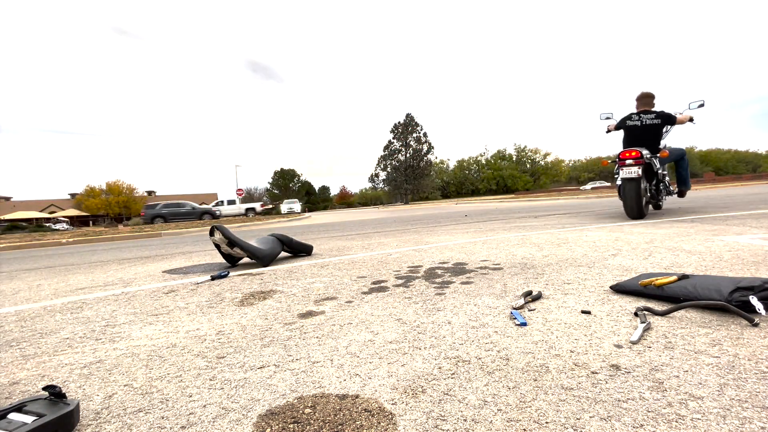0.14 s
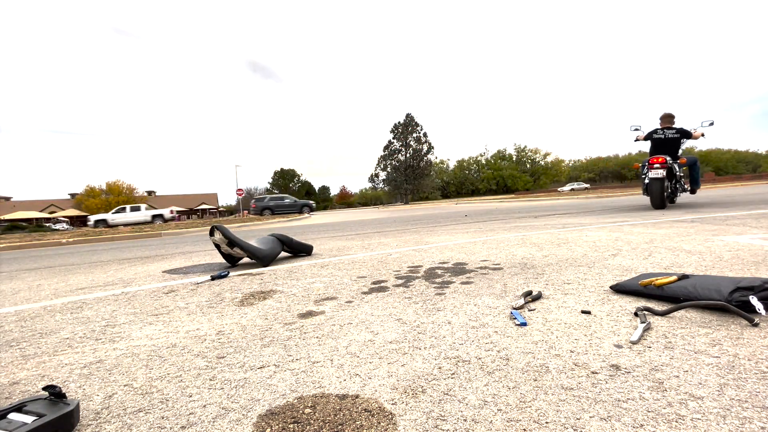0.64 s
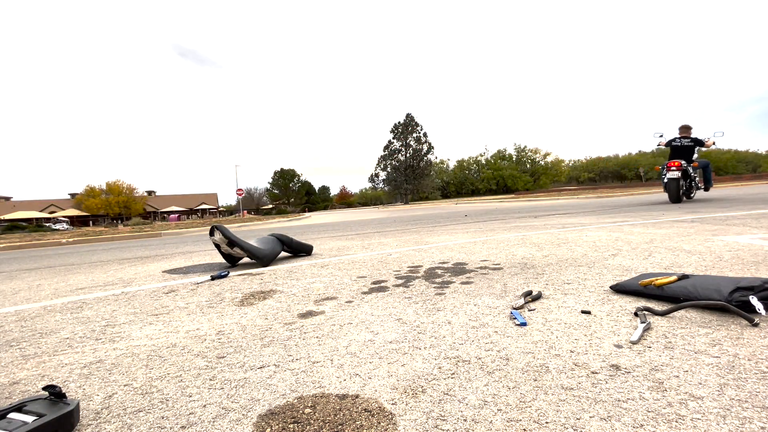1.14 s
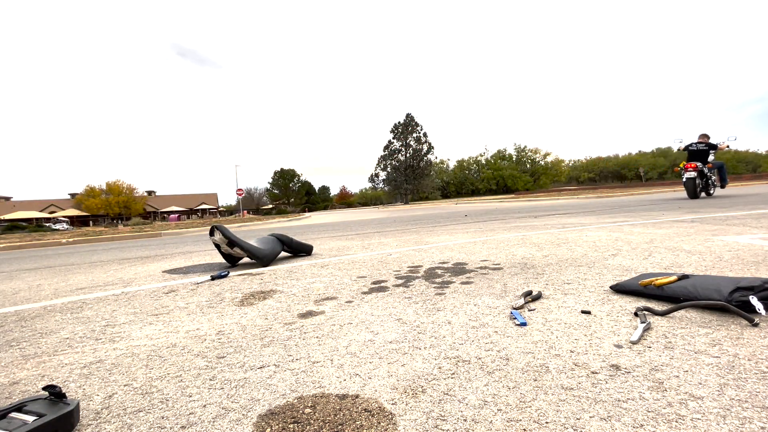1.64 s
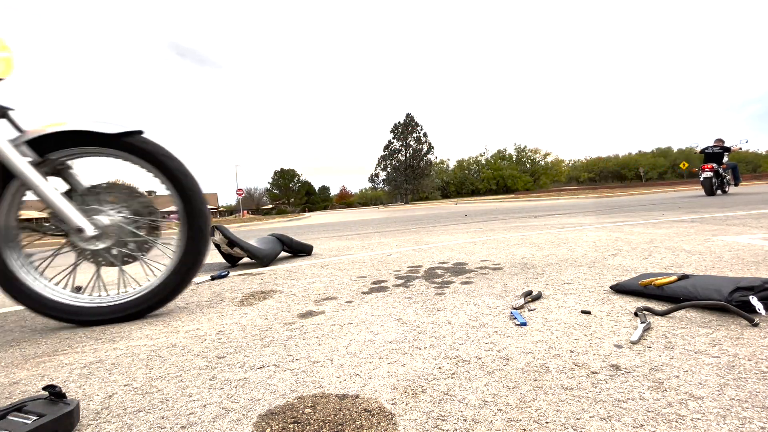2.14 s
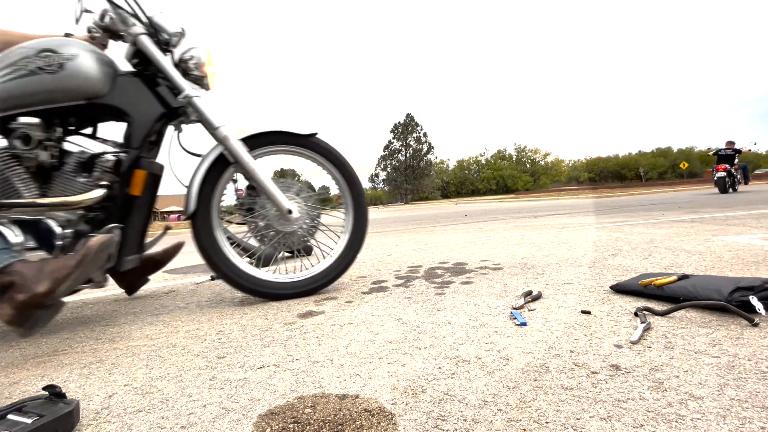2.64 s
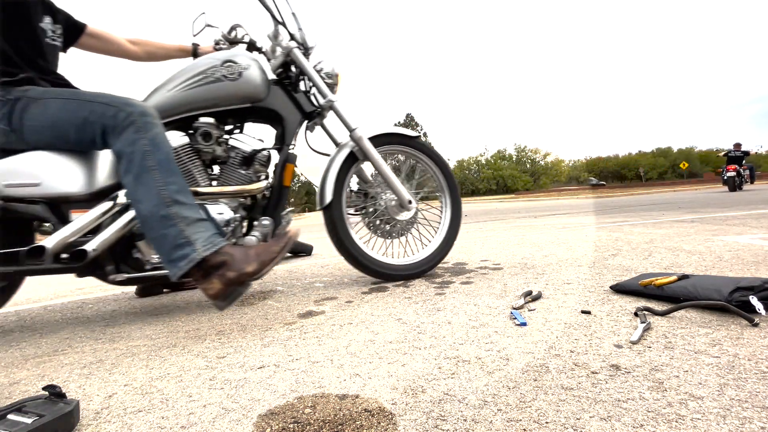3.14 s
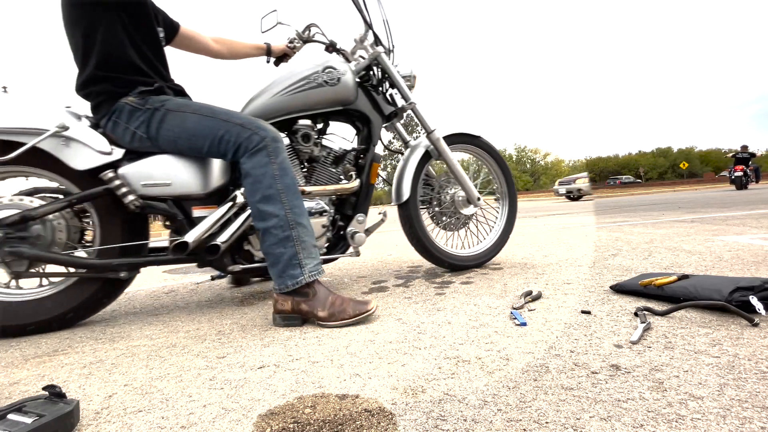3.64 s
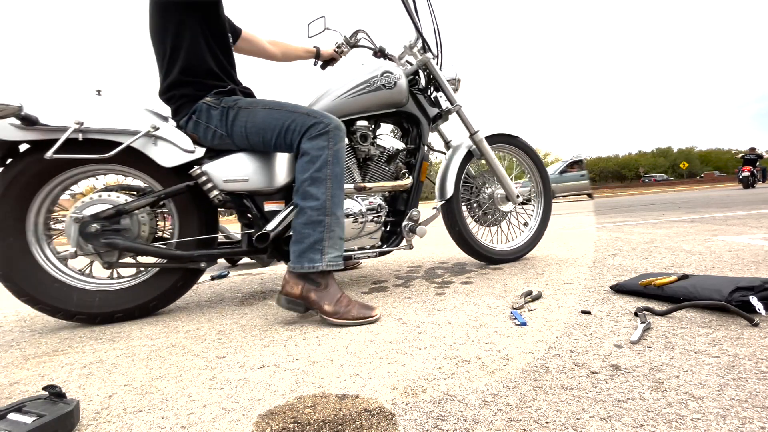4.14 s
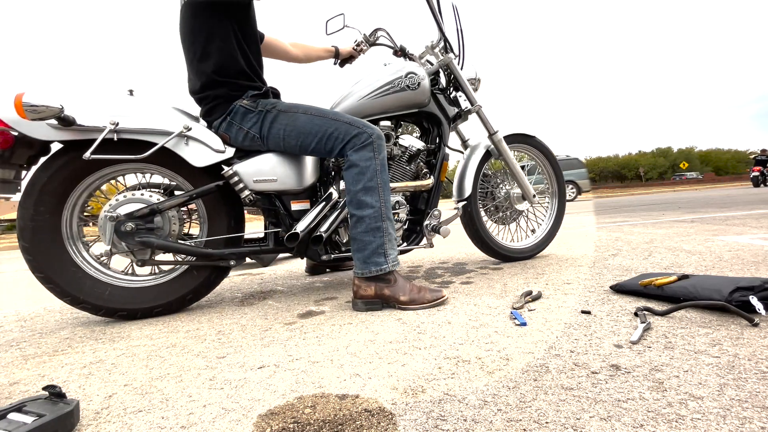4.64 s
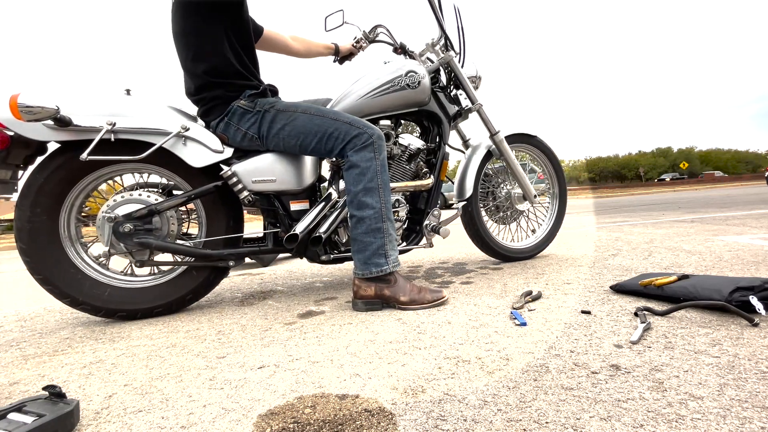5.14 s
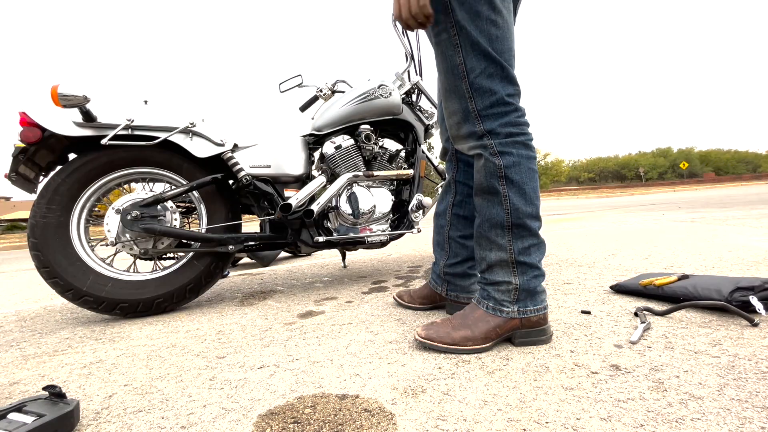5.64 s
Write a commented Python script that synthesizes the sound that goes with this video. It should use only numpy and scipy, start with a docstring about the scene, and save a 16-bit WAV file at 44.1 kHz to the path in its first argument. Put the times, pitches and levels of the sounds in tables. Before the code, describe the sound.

Lumpy two-cylinder motorcycle idle outdoors with three quick barking revs, a choppy settling idle, faint thuds and a louder close rev at the end.

```python
"""A V-twin idles unevenly, blips the throttle three times, then idles on with misfires and three low thuds.
At 5.478 s it is heard from closer, blipping once more. Each firing rings its pipe and gates noise:
crack, hiss and bark. Valve gear rustles; asphalt, cars and buildings scatter the sound over faint traffic.
Two spaced microphones: the left lags at the first place and leads at the closer one."""
import sys
import numpy as np
from scipy import signal
from scipy.fft import rfft, irfft
from scipy.io import wavfile

SR = 44100
rng = np.random.default_rng(int(sys.argv[2]) if len(sys.argv) > 2 else 0)


def put_to_file(sound):
    """Save the sound as 16-bit audio at rate SR, in the file named by the first command-line argument."""
    columns = np.atleast_2d(sound).T  # one column per channel
    safe = np.clip(columns, -1, 1)
    whole_steps = np.round(safe * 32767)
    wavfile.write(sys.argv[1], SR, whole_steps.astype(np.int16))


def how_loud(loudness_db):
    """Turn decibels into a plain amplitude multiplier (0 dB gives 1, 20 dB gives 10)."""
    steps = np.asarray(loudness_db, float) / 20
    return 10 ** steps


N = 254456
TIME = np.arange(N) / SR
HZ = np.arange(N // 2 + 1) * SR / N + 1e-3
CLOSER_S = 5.478


def shape(x, table):
    """Colour by (Hz, dB) points on a log frequency axis."""
    hz, db = np.transpose(table)
    gain_db = np.interp(np.log(HZ), np.log(hz), db)
    return irfft(rfft(x) * how_loud(gain_db), N)


def noise(table):
    """Coloured noise of rms 1."""
    x = shape(rng.standard_normal(N), table)
    return x / x.std()


def add(out, start_s, grain):
    """Mix a grain in at start_s."""
    i = int(start_s * SR)
    out[i:i + len(grain)] += grain[:N - i]


def hold(t, start_s, length_s, rise_s, fall_s):
    """0 to 1 and back: rise, hold, fall."""
    rise = np.clip((t - start_s) / rise_s, 0, 1)
    fall = np.clip((start_s + length_s - t) / fall_s, 0, 1)
    return rise * fall


def engine():
    """Each firing rings its pipe and gates gas noise; returns the full sound and a second draw of its gas."""
    s, rear, rate, size = firings()
    pipe_db, crack_db, bark_db, hiss_db, rear_db = load(s, rate)
    chance = rng.standard_normal((len(s), 8, 2))
    crack_db += rear_db * (rear - .5) + 1.2 * chance[:, 6, 0]
    hiss_db += 2.5 * chance[:, 6, 1]
    # each crack favours its own parts of the jet noise: 3 dB spread
    lean_db = 3 * rng.standard_normal((len(s), len(CRACK_PART_EDGES) + 1))
    # a harder firing strengthens the lowest part
    lean_db[:, 0] += 1.16 * (bark_db + 7.5)

    pipe, hiss, bark, *parts = np.zeros((3 + lean_db.shape[1], N))
    sharp = puff(rise_s=.003, fall_s=.001, echo_s=.0082, echo_db=-10.5, tail_s=.0066, tail_db=-31)
    top = puff(rise_s=.003, fall_s=.0009, echo_s=.0078, echo_db=-22, tail_s=.005, tail_db=-40)
    soft = puff(rise_s=.0069, fall_s=.0025, echo_s=.0079, echo_db=-2.5, tail_s=.013, tail_db=-22.5)
    for k in range(len(s)):
        pipe_gain = size[k] ** .5 * how_loud(pipe_db[k] + 6)
        add(pipe, s[k], pipe_gain * ring(rear[k], rate[k], bark_db[k], chance[k]))
        # gas leaks past the valve just before the blowdown
        early_s = max(s[k] - .001, 0)
        for part, db in zip(parts, lean_db[k]):
            add(part, early_s, size[k] * how_loud(crack_db[k] + db + 36.5) * sharp)
        add(hiss, early_s, size[k] * how_loud(crack_db[k] + hiss_db[k] + 36.5) * top)
        bark_gain = how_loud(pipe_db[k] + bark_db[k] + 17.5 + 2 * chance[k, 7, 0])
        add(bark, early_s, size[k] * bark_gain * soft)

    rate_now = speed()
    running_db = load(TIME, rate_now)[0]
    rumble = how_loud(running_db - 12.5) * noise(TRAFFIC_COLOUR)
    # valve gear rustles more at speed
    rustle_db = running_db - 38.5 + 0.41 * (rate_now - 13)
    heard = pipe + rumble + gas(parts, hiss, bark, rustle_db)
    return heard, gas(parts, hiss, bark, rustle_db)


# weak or failed firings: start_s [s], level_db [dB of gas noise; the pipe ring drops half as many dB]
MISFIRES = [(2.21, -11), (2.41, -15), (2.715, -33), (2.873, -26), (3.03, -21), (3.186, -15), (4.98, -13),
            (5.43, -11.5)]


def firings():
    """Times, cylinder (0 front, 1 rear), speed and size; rear follows front closely, then a long gap."""
    start_cycle, closer_cycle, rear_cycle = -.117, .37, .384
    rate, s, rear = speed(), [], []
    for start, heard in ((start_cycle, TIME < CLOSER_S), (closer_cycle, TIME >= CLOSER_S)):
        cycle = start + np.cumsum(rate[heard]) / SR
        whole = np.arange(int(cycle[-1]) + 1)
        fire = np.ravel([whole, whole + rear_cycle], order="F")
        keep = (fire > cycle[0]) & (fire < cycle[-1])
        s.extend(np.interp(fire[keep], cycle, TIME[heard]))
        rear.extend((np.arange(len(fire)) % 2)[keep])
    s, size = np.array(s), np.ones(len(s))
    for start_s, level_db in MISFIRES:
        size[np.argmin(abs(s - start_s))] = how_loud(level_db)
    return s, np.array(rear), np.interp(s, TIME, rate), size


# speed without blips: start_s [s], rate [four-stroke cycles/s]
IDLE_SPEED = [(0, 14.441), (.196, 11.518), (.367, 13.073), (.584, 12.59), (1.473, 14.215), (1.731, 17.765),
              (2.553, 12.349), (2.998, 12.688), (3.425, 12.758), (3.766, 16.473), (4.246, 14.357),
              (4.861, 14.524), (5.163, 13.536), (5.404, 12.247)]
# throttle blips: start_s [s], length_s [s], push [cycles/s gained per s]
BLIPS = [(.636, .186, 78.846), (.938, .218, 86.526), (1.448, .184, 67.806)]
# speed heard from closer: start_s [s], rate [cycles/s]
CLOSER_SPEED = [(5.478, 18.5), (5.51, 20.9), (5.55, 23.3), (5.65, 20.6), (5.77, 18.27)]


def speed():
    """Idle speed plus what each blip adds and the flywheel slowly loses."""
    grip_s, flywheel_s = .03, .3
    push = sum(gain * hold(TIME, s, length_s, grip_s, grip_s) for s, length_s, gain in BLIPS)
    spin = signal.lfilter([1 / SR], [1, -np.exp(-1 / SR / flywheel_s)], push)
    far = np.interp(TIME, *np.transpose(IDLE_SPEED)) + spin
    closer = np.interp(TIME, *np.transpose(CLOSER_SPEED))
    return np.where(TIME < CLOSER_S, far, closer)


# full charges: start_s [s], length_s [s], pipe_gain_db [dB, unless the rev gain is higher]
ROARS = [(0.634, 0.21, 2), (0.933, 0.21, 9), (1.454, 0.21, 9.5), (5.444, 0.14, 6)]
# place and pipe bearing, one table per listening place: start_s [s], pipe_db [dB],
# hiss_db [dB over crack], rear_db [dB, crack of rear over front cylinder]
BEARING = ([(0, -27.5, 4.5, 4.5), (.3, -30, -1, -0.5), (.55, -33, -6.5, 0), (.75, -28, -1.5, 6.5),
           (.9, -33, -13, 1.5), (1.1, -33, -10.5, -4), (2, -34.5, -21.5, 4.5), (2.4, -35.5, -20, -1),
           (3.3, -35, -10, 1.5), (3.9, -33, -20, 1.5), (4.7, -35, -7, 7), (4.9, -38, -17, 1),
           (5.15, -36, -17.5, -1.5), (5.47, -38, -5, -5.5)], [(5.479, -25.5, -10, 5),
           (5.56, -21, -7.5, -6.5), (5.61, -26, -1, -9.5), (5.77, -20, -2, -1.5)])


def load(t, rate):
    """Pipe, crack, bark, hiss and rear-share dB from place, charge and speed."""
    roar_rise_s, roar_fall_s = .056, .042
    rev_from, rev_db = 18.86, .7963  # cycles/s; dB per cycle/s above it
    overrun_from, overrun_span = 16, 4  # cycles/s
    at_s, *columns = np.concatenate(BEARING).T
    place_db, hiss_db, rear_db = (np.interp(t, at_s, c) for c in columns)
    roars = [(hold(t, s, length_s, roar_rise_s, roar_fall_s), db) for s, length_s, db in ROARS]
    full = sum(swell for swell, db in roars)
    # the shut throttle starves the cylinders at higher speed
    overrun = np.clip((rate - overrun_from) / overrun_span, 0, 1)
    roar_db = sum(swell * db for swell, db in roars)
    pipe_db = place_db + np.maximum(roar_db, rev_db * np.maximum(rate - rev_from, 0))

    def by_load(idle_db, overrun_db, full_db):
        """Blend idle, starved and full-charge levels."""
        return (1 - full) * (idle_db + overrun * (overrun_db - idle_db)) + full * full_db

    crack_db = pipe_db + by_load(idle_db=-14, overrun_db=-28.5, full_db=-10)
    bark_db = by_load(idle_db=-16, overrun_db=-14.5, full_db=-8)
    return pipe_db, crack_db, bark_db, hiss_db, rear_db


# main ring, rows front and rear: pitch_hz [Hz], glide_hz_per_s [Hz/s at 13 cycles/s], crest_s [s],
# extra_turns [turns, decaying from 4 ms], open_cycles [engine cycles the valve stays open]
MAIN_RING = [(119.8, 850, 0.01767, 0.5, 0.37), (156.2, 4240, 0.01734, 0.65, 0.28)]
# other pipe modes: pitch_hz [Hz], glide_hz_per_s [Hz/s at 13 cycles/s], decay_s [s],
# level_db [dB; above 250 Hz the bark level is added]
FRONT_MODES = [(78.4, -4, 0.018, -14), (133.9, -1, 0.044, -13.5), (280.2, 8997, 0.023, 3.5),
               (557, 5997, 0.014, -8.5), (718, 1, .012, -14.5)]
REAR_MODES = [(84.8, -7, 0.017, -12), (184.55, 1995, .025, -5.5), (429.5, 9000, 0.025, -1.5),
              (303, 2997, 0.0087, 5), (930, 0, 0.014, -8)]


def ring(rear, rate, bark_db, chance):
    """The blowdown starts high, the pipe rings while the valve is open, hot gas draws the pitch up."""
    ring_start_s, blowdown_s = .0025, .003
    detune, scatter_db, mode_scatter_db = .02, 1.3, 2.5
    t = np.arange(int(.08 * SR)) / SR
    u = np.maximum(t - ring_start_s, 0)
    hz, glide, crest_s, extra, cycles = MAIN_RING[rear]
    blowdown = extra * np.exp(-(t - .004) / blowdown_s)
    # the gas heats the pipe sooner at higher speed
    warming = rate / 13
    turns = hz * (1 + detune * chance[0, 0]) * (t - crest_s)
    turns = turns + glide * warming * (t - crest_s) ** 2 / 2 - blowdown
    # a harder firing arrives more abruptly
    rise_s = .001 * how_loud(-1.5 * (bark_db + 7))
    # the closing valve ends the main ring and the upper modes
    flow = np.exp(-(u * rate / cycles) ** 3)
    out = how_loud(scatter_db * chance[0, 1]) * (1 - np.exp(-u / rise_s)) * flow * np.cos(2 * np.pi * turns)
    for (hz, glide, decay_s, db), (a, b) in zip((FRONT_MODES, REAR_MODES)[rear], chance[1:]):
        upper = hz > 250
        db = db + mode_scatter_db * b + (bark_db if upper else 0)
        turns = hz * (1 + 2.5 * detune * a) * u + glide * warming * u ** 2 / 2
        envelope = (1 - np.exp(-u / .004)) * np.exp(-u / decay_s) * (flow if upper else 1)
        out = out + how_loud(db) * envelope * np.sin(2 * np.pi * turns)
    return out


def puff(rise_s, fall_s, echo_s, echo_db, tail_s, tail_db):
    """Gas envelope: a short burst, its return from the far end of the pipe, then slow outflow."""
    t = np.arange(int(.08 * SR)) / SR
    swell = lambda u: (1 - np.exp(-np.maximum(u, 0) / rise_s)) ** 2
    burst = lambda u: swell(u) * np.exp(-np.maximum(u, 0) / fall_s)
    outflow = how_loud(tail_db) * swell(t) * np.exp(-t / tail_s)
    return burst(t) + how_loud(echo_db) * burst(t - echo_s) + outflow


# colour of top hiss: pitch_hz [Hz], level_db [relative dB]
HISS_COLOUR = [(7000, -20), (9000, 19.5), (11000, 18), (13000, 14.5), (15000, -13), (16500, 11.5)]
# colour of bark: pitch_hz [Hz], level_db [relative dB]
BARK_COLOUR = [(200, -14), (350, -8), (500, 1), (700, 7.5), (1000, 0.5), (1400, -10.5), (2000, -25),
               (3000, -33)]


def gas(parts, hiss, bark, rustle_db):
    """Turbulent gas as gated crack, hiss and bark noise, plus steady valve-gear rustle."""
    jet = crack(parts) + hiss * noise(HISS_COLOUR) + bark * noise(BARK_COLOUR)
    return jet + how_loud(rustle_db) * noise(CRACK_COLOUR)


# colour of crack and rustle: pitch_hz [Hz], level_db [relative dB]
CRACK_COLOUR = [(400, -34), (900, 7.5), (1600, 7.5), (2400, 1), (3500, -4.5), (4600, -1.5), (5600, -0.5),
                (7000, -3.5), (8500, -14.5), (10000, -7), (13000, -84)]
# edges between parts of the crack: edge_hz [Hz]
CRACK_PART_EDGES = [1800, 2700, 3800, 5200, 7000, 9500]


def crack(parts):
    """Jet noise whose parts, low to high, follow their own envelopes."""
    jet = rfft(noise(CRACK_COLOUR))
    below = [0] + [1 / (1 + (HZ / edge_hz) ** 8) for edge_hz in CRACK_PART_EDGES] + [1]
    return sum(part * irfft(jet * (hi - lo), N) for part, lo, hi in zip(parts, below, below[1:]))


# colour at the closer place: pitch_hz [Hz], level_db [dB]
CLOSER_COLOUR = [(100, 2), (300, 0.5), (520, 4), (720, -4), (1050, -8), (1500, -0.5), (2100, 8),
                 (2900, 2.5), (6000, 2.5), (12000, 6)]


def closer_colour(x):
    """Tone shifts at the closer listening place."""
    return np.where(TIME < CLOSER_S, x, shape(x, CLOSER_COLOUR))


# one table per listening place: pitch_hz [Hz], lag [samples, left after right], level_db [dB, left minus right]
# bass bends round the housing and shifts most
PORTS = [
    [(100, 26.7, -1.5), (630, 21.54, -3.5), (1290, 12.33, -3.5), (4500, 11.58, -3), (9300, 11.49, -4.5),
     (15300, 11.38, 6.5)],
    [(100, -32, -2), (300, -13, -1), (1030, -5, 1), (4900, -3.5, -1), (8060, -2, 7), (14600, -3.5, 1.5)],
]


def microphones(x):
    """Spacing sets lag and level between left and right at each listening place."""
    places = []
    for table in PORTS:
        hz, lag, db = np.transpose(table)
        lag, db = (np.interp(np.log(HZ), np.log(hz), c) for c in (lag, db))
        half = how_loud(db / 2) * np.exp(-1j * np.pi * HZ * lag / SR)
        places.append(irfft(rfft(x) * np.array([half, 1 / half]), N))
    return np.where(TIME < CLOSER_S, *places)


# thuds as the boots come down: start_s [s], level_db [dB, before 4/3 envelope crest], pitch_hz [Hz]
THUDS = [(3.13, -40, 45.7), (3.52, -52, 51.3), (4.06, -58, 45)]


def thuds():
    """Soft low blows on the ground: sines that swell for 20 ms and die away."""
    out, t = np.zeros(N), np.arange(int(.2 * SR)) / SR
    envelope = t / .015 * np.exp(1 - t / .02)
    for start_s, level_db, pitch_hz in THUDS:
        add(out, start_s, how_loud(level_db) * envelope * np.sin(2 * np.pi * pitch_hz * t))
    return out


def yard(x):
    """Scattered returns from asphalt, cars and buildings: decaying noise, different left and right."""
    t60_s, wet_db, pan_db = .14, -17, -2.2
    t = np.arange(int(.5 * SR)) / SR
    tail = rng.standard_normal((2, len(t))) * np.exp(-np.log(1000) * t / t60_s) * (t > .003)
    tail = signal.lfilter(*signal.butter(1, 7000, fs=SR), tail)
    tail = signal.lfilter(*signal.butter(1, 260, "high", fs=SR), tail)
    tail /= np.sqrt(np.sum(tail ** 2, axis=1, keepdims=True))
    side_db = wet_db + np.array([[pan_db], [-pan_db]]) / 2
    return how_loud(side_db) * signal.fftconvolve(x[None], tail, axes=1)[:, :N]


# colour of traffic, also of engine rumble: pitch_hz [Hz], level_db [relative dB]
TRAFFIC_COLOUR = [(20, -27), (40, -5), (80, 7.5), (140, 16), (300, 2), (700, -8.5), (2000, -16),
                  (6000, -36), (12000, -163)]


def traffic():
    """Distant traffic as steady low noise, independent left and right."""
    return how_loud(-56) * np.array([noise(TRAFFIC_COLOUR), noise(TRAFFIC_COLOUR)])


def scene():
    """Both listening places, one after the other, over distant traffic."""
    bike, spread = (closer_colour(x) for x in engine())
    # the jet is not a point: part of its noise differs between the microphones
    wide = how_loud(-12) * spread * np.array([[.8], [-1]])
    return microphones(bike) + wide + yard(bike) + traffic() + thuds()


def band_limit(x):
    """A steep low-pass at the top of the band."""
    return signal.sosfilt(signal.butter(12, 16440, fs=SR, output="sos"), x)


def record(dry):
    """Small microphones cut bass and treble and round the peaks."""
    cut = signal.sosfilt(signal.butter(3, 52, "high", fs=SR, output="sos"), dry)
    cut = signal.sosfilt(signal.butter(8, 15200, fs=SR, output="sos"), cut)
    rounded = np.tanh(1.6 * cut) / 1.6
    return band_limit(rounded)


dry = scene()
out = record(dry)
put_to_file(out)
```